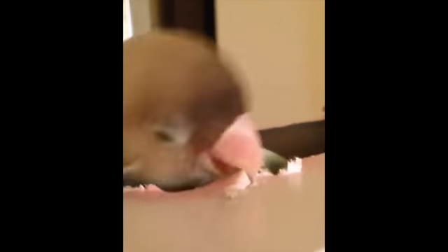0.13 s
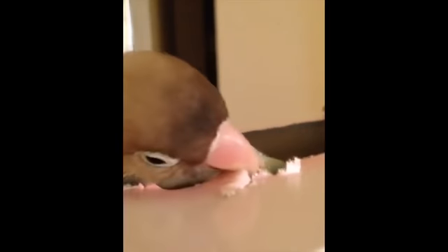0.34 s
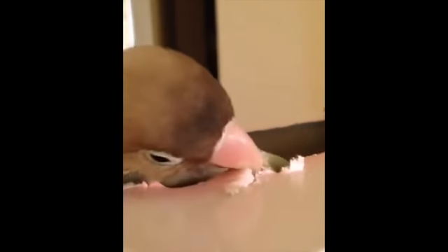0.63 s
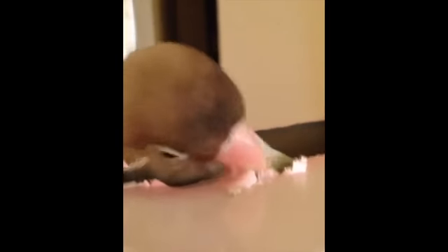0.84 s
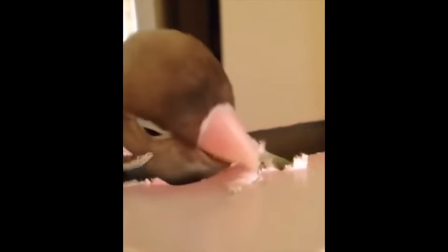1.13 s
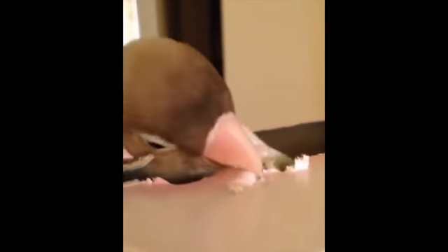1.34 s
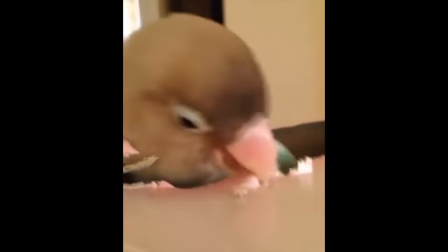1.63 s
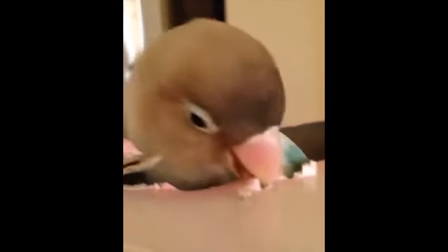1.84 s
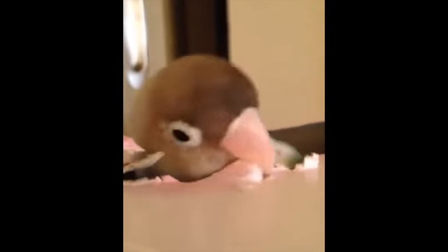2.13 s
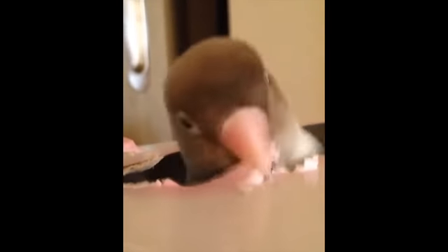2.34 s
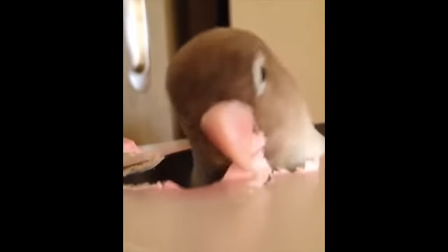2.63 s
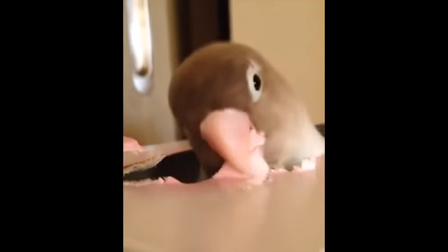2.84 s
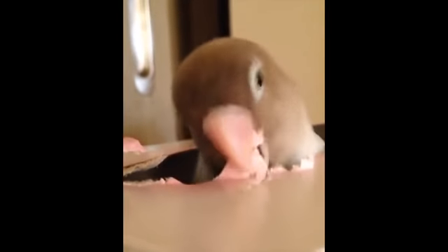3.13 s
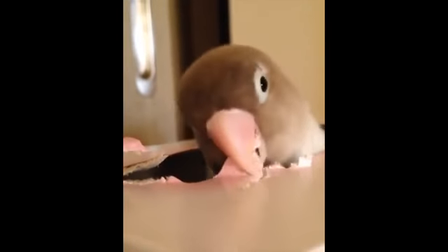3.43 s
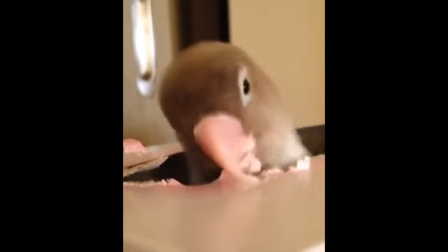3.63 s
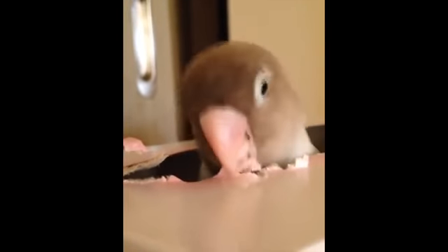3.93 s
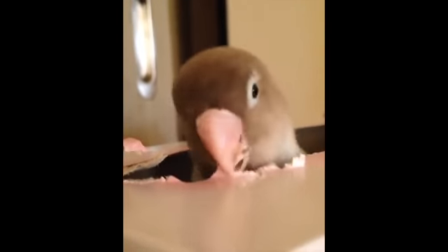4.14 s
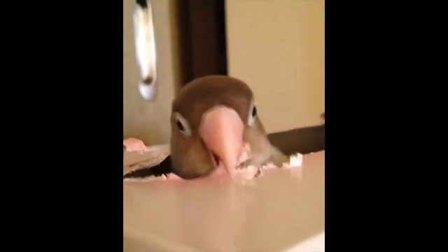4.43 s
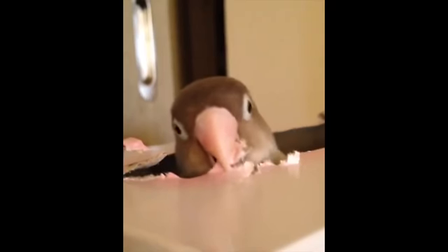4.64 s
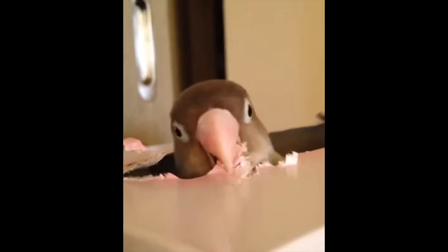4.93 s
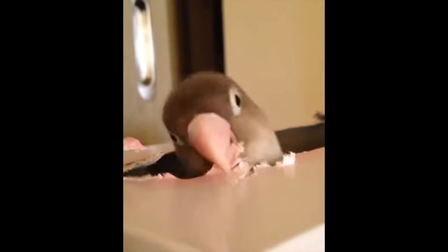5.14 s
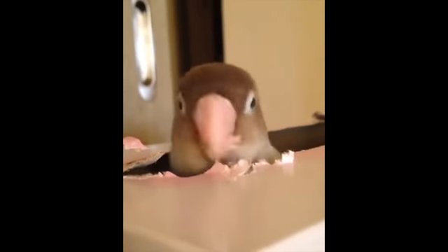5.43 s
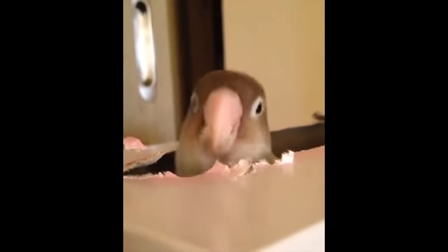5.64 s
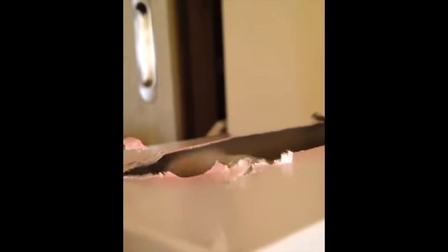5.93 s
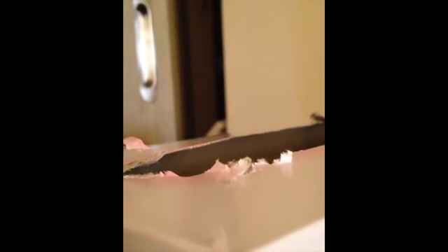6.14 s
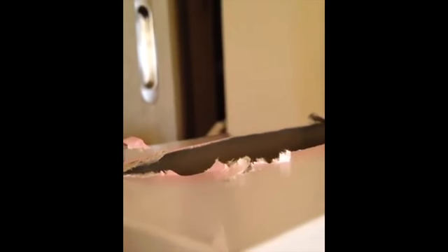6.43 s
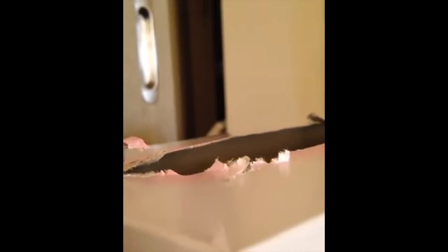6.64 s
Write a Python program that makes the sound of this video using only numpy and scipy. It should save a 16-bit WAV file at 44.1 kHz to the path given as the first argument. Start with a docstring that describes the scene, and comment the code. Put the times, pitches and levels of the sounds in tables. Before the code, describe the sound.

Close, irregular cardboard gnawing by a small bird: dry clicks, a few louder hollow pops, short tearing scratches, then near quiet and final knocks.

```python
"""A small parrot chews the torn edge of a hollow cardboard box, close to a phone, in a quiet room.
Each tug of the beak is a short gritty burst that sets the box ringing, and snapping fibres tick in the treble.
Paper tears in short rasps of tiny slips, and between bites the beak rubs the edge in jerks.
A short dull echo follows the tugs and snaps; a wavering low drone and microphone hiss lie underneath."""
import sys
import numpy as np
from scipy import signal
from scipy.fft import rfft, irfft, next_fast_len
from scipy.io import wavfile
from scipy.ndimage import uniform_filter1d, map_coordinates

SR = 44100
rng = np.random.default_rng(int(sys.argv[2]) if len(sys.argv) > 2 else 0)


def wav_out(sig):
    """Save sig, one row per channel (or a flat mono array), as 16-bit PCM at SR to the path in sys.argv[1]."""
    wavfile.write(sys.argv[1], SR, np.round(np.clip(np.atleast_2d(sig).T, -1, 1) * 32767).astype(np.int16))


N = 298998

# Tugs of the beak: start t/s, walls level/dB, lid over walls/dB, side over walls/dB,
# edge over walls/dB, dying time/s
BEAK_TUGS = [(0.262, -30, -17, -11, -6, 0.0019), (0.273, -35.5, -8, -5, -9.5, 0.0038),
             (0.291, -41.5, -8, -3, 1.5, 0.0028), (0.331, -44, -10, -6, -7, 0.0021),
             (0.354, -35, -15, -13, 1.5, 0.0021), (0.366, -50, -18, -4, -7, 0.00036),
             (0.4, -32.5, -14, -15, 0.5, 0.00125), (0.418, -38, -8, -5, 1, 0.0027),
             (0.816, -45, -11, -5, -17, 0.0016), (0.873, -52, -14, -15, -1, 0.0028),
             (0.965, -43.5, -13, -6, -10, 0.0032), (1.002, -39.5, -11, -14, -10, 0.003),
             (1.096, -55, -8, -10, 2, 0.0054), (1.161, -51, 10, 4.5, 6, 0.00096),
             (1.238, -43.5, 1, -5, -9, 0.0016), (1.251, -44, -10, -11, -2.5, 0.0038),
             (1.321, -45, -3, -12, -9, 0.0025), (1.4, -26, -23, -20, -19.5, 0.002),
             (1.516, -43, -25, -14, -8.5, 0.0023), (1.536, -50, -17, -11, -9, 0.0007),
             (1.619, -16, -32, -17.5, -9.5, 0.0025), (1.965, -44.5, -2, -13, -20, 0.0013),
             (2.012, -50, -21, -14, -13, 0.002), (2.141, -50.5, -6, 4.5, 8.5, 0.0044),
             (2.297, -40, 2.5, -0.5, -17, 0.0026), (2.338, -43, 3, -12, -9, 0.0012),
             (2.384, -50, -1, -1, 7.5, 0.0025), (2.431, -39.5, 2, 0.5, 0, 0.0021),
             (2.476, -44, 5, -2, -2, 0.0014), (2.519, -40.5, -1.5, -3, -3, 0.01),
             (2.533, -31, -22, -7.5, -1, 0.0014), (2.563, -45, -17, -10, -12, 0.003),
             (2.804, -45.5, -9, -5, -16, 0.0017), (2.929, -38, -4.5, -4, -7, 0.0015),
             (2.984, -47, -17, 0, 0, 0.0016), (3.037, -40, -21, -21, -18, 0.0026),
             (3.054, -42.5, -16, -7, -7, 0.00072), (3.186, -42, -16, -7, -10, 0.0027),
             (3.299, -45, -2, -0.5, -0.5, 0.0013), (3.429, -42.5, -11, -7, -5.5, 0.0063),
             (3.485, -37.5, -12, -1.5, -4, 0.0023), (3.594, -30, -10, -3.5, -6.5, 0.0013),
             (3.615, -28, -12, -14, -19, 0.0036), (3.734, -48.5, -9, -4, 2, 0.0028),
             (3.77, -43.5, -11, -1, 1, 0.00081), (3.985, -52, -8, -17, 10, 0.0029),
             (4.066, -35, -11, -3.5, -5, 0.00074), (4.088, -46, -14, -9, 3, 0.00114),
             (4.107, -49.5, -16, -13, 3, 0.00066), (4.138, -40.5, -17, -15, -0.5, 0.0006),
             (4.145, -38.5, -14, -6, -4.5, 0.0014), (4.169, -49, -16, -3, 6, 0.0009),
             (4.309, -39.5, -15.5, -5.5, -2.5, 0.0014), (4.364, -46, -20, -20, -3, 0.0033),
             (4.411, -43, -9, -3, -9, 0.0011), (4.513, -42, -16, -25, -12, 0.0016),
             (4.543, -39.5, -17, -7, -18, 0.0032), (4.576, -36, -1, -8, -15, 0.00072),
             (4.755, -44.5, -1, -3, -9, 0.0013), (4.834, -47, -13.5, -13, -6, 0.00081),
             (5.007, -33, -5.5, -9.5, -8, 0.00091), (5.082, -46, -1, 4, 0.5, 0.0035),
             (5.302, -43.5, -13, -5.5, -10, 0.0032), (5.316, -44, -19.5, -4, 4.5, 0.0019),
             (5.476, -26, -20, -8, -10, 0.0019), (5.493, -49, -18, -4, 0.5, 0.004),
             (5.539, -46, -20, -14, 11.5, 0.0033), (5.558, -44.5, -0.5, -21, -14, 0.0014),
             (6.474, -46, -4, -14, 2, 0.0037), (6.5, -27.5, -18, -9.5, -30, 0.0015),
             (6.693, -27.5, -14, -3, -19.5, 0.002)]
# Fibres snapping: start t/s, middle level/dB, top end over middle/dB, dying time/s
FIBRE_SNAPS = [(0.2613, -45, -8, 0.00076), (0.2912, -49, -6, 0.00021), (0.35, -39, -10, 0.00054),
               (0.3538, -49, -4, 0.00023), (0.368, -51, -13, 0.00023), (0.399, -38, -7, 0.0005),
               (0.419, -57, -4, 0.0013), (1.401, -48, 0, 0.0015), (1.5908, -57, -1, 0.0023),
               (1.6185, -36, -21, 0.00044), (1.894, -53, -10, 0.00044), (2.1725, -53, -6, 0.0003),
               (2.1934, -53, -7, 0.00025), (2.4324, -62, -7, 0.0013), (2.5326, -47.5, 0, 0.00055),
               (2.574, -53, -5, 0.0004), (2.604, -44.5, 1, 0.0013), (2.692, -56, -8, 0.0016),
               (2.7, -51, -1, 0.00028), (2.93, -60, 9, 0.00033), (2.952, -58, 10, 0.0003),
               (2.993, -60, 9, 0.0003), (3.019, -57, 0, 0.00032), (3.038, -53, 11, 0.00033),
               (3.055, -55, 11, 0.00043), (3.1532, -51, -4, 0.001), (3.38, -51, 1, 0.00069),
               (3.5109, -49, 0.5, 0.00055), (3.5693, -48, -8, 0.0011), (3.5898, -42.5, 2, 0.0015),
               (3.597, -49, 10, 0.0008), (3.613, -51, 6, 0.0014), (3.617, -46, -13, 0.0007),
               (3.709, -50, 0, 0.0015), (3.9454, -53, 4, 0.0004), (3.9619, -58, 10, 0.00034),
               (3.9843, -37.5, 4, 0.0009), (3.994, -53, 10, 0.00049), (4.0876, -47, -4, 0.00052),
               (4.1067, -47, 3, 0.00033), (4.1365, -51, 10.5, 0.00081), (4.145, -47, -4, 0.00061),
               (4.154, -50, -5, 0.0013), (4.1679, -45, -7, 0.00035), (4.176, -46, -4, 0.00075),
               (4.7411, -49, -11, 0.00086), (5.0838, -55, 2, 0.00055), (5.3033, -49.5, -9, 0.0011),
               (5.32, -49, -12, 0.00052), (5.4784, -45, -1, 0.00065), (5.5114, -51, -5, 0.0063),
               (5.5378, -50, -8, 0.0017), (6.482, -43.5, -13, 0.0019), (6.4996, -55, -10, 0.00093),
               (6.6982, -46.5, -1, 0.0013)]
# Paper tearing in short rasps: middle t/s, length/s, tearing hiss level/dB, edge over hiss/dB
PAPER_RASPS = [(0.047, 0.085, -64, 5), (.275, 0.034, -56, 0), (0.301, 0.031, -54, 3),
               (0.363, 0.036, -51, 8), (0.418, .045, -52, 1), (0.877, 0.029, -61, 5),
               (0.996, 0.073, -59, 5.5), (1.101, 0.037, -58.5, 0.5), (1.144, 0.077, -67, 9),
               (1.22, 0.1, -70, 11.5), (1.412, 0.053, -63, 5.5), (1.65, .06, -60, 6),
               (1.605, 0.034, -52, -9), (1.907, 0.13, -60.5, 2), (2.214, 0.11, -57, -5.5),
               (2.372, 0.1, -65, 11.5), (2.495, 0.077, -66, 10), (2.443, 0.049, -61, 15),
               (2.602, 0.088, -51, -4), (2.692, 0.049, -59.5, -14), (2.801, 0.076, -56, -11),
               (2.964, 0.088, -60.5, -4), (3.039, 0.11, -55, -1.5), (3.192, 0.17, -57, -13),
               (3.268, 0.032, -59, 5.5), (3.378, 0.046, -55.5, -6), (3.608, 0.043, -46.5, 3),
               (3.889, 0.076, -54, -2), (3.978, 0.071, -52, -8), (4.167, 0.085, -49.5, -2.5),
               (4.226, 0.012, -56, 2), (4.368, 0.12, -59.5, -2), (4.433, .04, -60, 2.5),
               (4.572, 0.066, -51.5, 1.5), (4.734, 0.077, -61.5, 5.5), (4.833, .05, -57, -6.5),
               (5.09, 0.029, -55, -0.5), (5.112, .07, -66.5, 9.5), (5.269, 0.053, -52.5, -9),
               (5.315, 0.029, -61.5, 12), (5.364, 0.035, -61, -3), (5.514, 0.027, -54.5, 9),
               (5.552, 0.055, -53, 5), (6.492, 0.086, -56, 1.5)]
# Rubbing between bites: t/s, level in the walls/dB
RUB_LEVELS = [(0.0, -61.5), (0.23, -60), (0.51, -70), (0.73, -67.5), (1.09, -55.5), (1.42, -61),
              (2.19, -55.5), (2.34, -58), (2.49, -50), (2.72, -60), (3.44, -57.5), (4.04, -56.5),
              (4.55, -60.5), (4.81, -67.5), (5.04, -61.5), (5.17, -62), (5.44, -61.5), (5.55, -62),
              (5.83, -75), (6.46, -72), (6.67, -66.5), (6.78, -64)]
# Low drone: t/s, level/dB before DRONE_LIFT_DB
DRONE_LEVELS = [(0.0, -58), (0.05, -71), (4.14, -63), (4.17, -51), (4.68, -66.5), (4.76, -54), (5.19, -80),
                (5.23, -53), (5.38, -76), (5.48, -45), (5.63, -80), (5.72, -48.5), (5.8, -61.5),
                (5.99, -50), (6.21, -59.5), (6.78, -49.5)]

# Resonances of the box and the paper, each table: f/Hz, width/Hz, relative level/dB
WALL_MODES = [(543.5, 75, -6.5), (682, 55.4, -2.5), (825, 49.4, -1), (1001, 141, -1), (1173, 248, -3.5)]  # box walls
LID_MODES = [(143.7, 27.3, -0.44), (216, 35, -0.34)]  # box lid
SIDE_MODES = [(278, 29, -1.5), (351, 79, -2)]  # box side
EDGE_MODES = [(1537, 330, 1.5), (1959, 300, 5), (2407, 120, 3), (2810, 840, -4), (3447, 190, 0.5),
              (4070, 530, -5.5)]  # stiff edge
FIBRE_MODES = [(6350, 22000, 0)]  # rubbed fibres
TEAR_MODES = [(5100, 5900, 0)]  # tearing paper
# Colour of the hiss: f/Hz, relative level/dB per Hz
HISS_COLOUR = [(15, -54), (40, -4.5), (110, -5), (200, -12.5), (400, -19.5), (1300, -27.5), (3000, -29),
               (6000, -29), (13000, -31), (16000, -24.5)]

SPAN, LEAD = 4096, 1024  # samples: window of one event, and its part before the crest
TUG_RISE, SNAP_RISE = 0.9, 0.6  # swell time over dying time
JOLT_GROWS = 0.42  # dB of clean jolt per dB of tug
RASP_SKEW = 0.67  # under 1: a tear starts faster than it fades
RASP_WALLS_DB = -0.5  # the walls over the edge
RUB_USUAL_DB = -59  # walls level at the usual pressure
RUB_THUD_DB, RUB_EDGE_DB, RUB_FIBRES_DB = -61, -64.5, -65.5  # at the usual pressure
THUD_GROWS, EDGE_GROWS, FIBRES_GROWS = 1, 0.82, 0.41  # dB per dB of pressure
ECHO_DB, DRONE_LIFT_DB, HISS_DB = -21, 3.5, -56.5
ROLL_HZ, TOP_HZ = 13950, 15150  # the phone starts to fade, and stops


def tugs():
    """Harder tugs jolt cleaner; each drives lid, side, walls and edge, every mode at a new strength."""
    start, db, lid_db, side_db, edge_db, fall = np.transpose(BEAK_TUGS)
    rise = TUG_RISE * fall
    jolt = 8.1 * amp(JOLT_GROWS * (db - db.mean()))[:, None]
    push = bursts(rise, fall, jolt)
    deep_push = soft(push, hz=1530)  # the fold damps what travels on into the box
    edge_push = soft(push, hz=4200)

    def ring(drive, table, level_db):
        """One part of the box rings, its modes scattered afresh for every tug."""
        scatter_db = rng.normal(0, 1.53, (len(start), len(table), 1))
        return amp(level_db)[:, None] * peak(filtered(drive, modes(table, scatter_db)))

    walls = ring(deep_push, WALL_MODES, db)
    lid = ring(deep_push, LID_MODES, db + lid_db)
    side = ring(deep_push, SIDE_MODES, db + side_db)
    edge = ring(edge_push, EDGE_MODES, db + edge_db)
    return place(start + rise, walls + lid + side + edge)


def snaps():
    """Fibres break: bright ticks, some dull, some mostly top end."""
    start, db, top_db, fall = np.transpose(FIBRE_SNAPS)
    rise = SNAP_RISE * fall
    crack = bursts(rise, fall, jolt=1.5)
    # squaring a resonance passes the sound through it twice
    middle = peak(filtered(crack, lambda f: modes([(5800, 5000, 0)])(f) ** 2))
    top = peak(filtered(crack, lambda f: modes([(11500, 7000, 0)])(f) ** 2))
    return place(start + rise, amp(db)[:, None] * (middle + amp(top_db)[:, None] * top))


def rasps():
    """Each tear swells and fades; its gritty slips hiss in the paper and buzz edge and walls."""
    middle, length, db, edge_db = np.transpose(PAPER_RASPS)
    progress = ((np.arange(SPAN) - SPAN // 2) / SR) / length[:, None]  # the window cuts the longest tears
    swell = np.sin(np.pi * np.clip(progress + 0.5, 0, 1) ** RASP_SKEW)
    at = (middle - (SPAN // 2 - LEAD) / SR).clip(0)  # puts the window's centre on the middle
    hiss_level = place(at, amp(db)[:, None] * swell)
    box_level = place(at, amp(db + edge_db)[:, None] * swell)
    slips = grains(1.95 * wobble(120), spike_db=4.0)
    box = murmur(EDGE_MODES, slips) + amp(RASP_WALLS_DB) * murmur(WALL_MODES, slips)
    return hiss_level * murmur(TEAR_MODES, slips) + box_level * box


def rubbing():
    """The beak slides on the edge in jerks and keeps the box murmuring; one pressure drives every part."""
    walls_db, = curves(RUB_LEVELS)
    press_db = walls_db - RUB_USUAL_DB
    jerks = 4.65 * wobble(22) + 3.9 * wobble(90)
    thud_clumps = 0.46 * jerks + 3.7 * wobble(30)
    walls = murmur(WALL_MODES, grains(0.63 * jerks, spike_db=4.5))
    edge = murmur(EDGE_MODES, grains(0.88 * jerks, spike_db=-1.0))
    thud = murmur(LID_MODES + SIDE_MODES, grains(thud_clumps, spike_db=1.5))
    fibres = murmur(FIBRE_MODES, grains(0.71 * jerks, spike_db=-1.0))
    walls = amp(walls_db) * walls
    edge = amp(RUB_EDGE_DB + EDGE_GROWS * press_db) * edge
    thud = amp(RUB_THUD_DB + THUD_GROWS * press_db) * thud
    fibres = amp(RUB_FIBRES_DB + FIBRES_GROWS * press_db) * fibres
    return walls + edge + thud + fibres


def tail(x):
    """The near walls answer with a short dull wash of decaying noise."""
    t = np.arange(SR // 4) / SR
    fading_noise = rng.standard_normal(len(t)) * amp(-60 * t / 0.11)  # 60 dB down in 0.11 s
    wash = soft(fading_noise, hz=2620)
    delayed = np.pad(x, (300, 0))  # samples, about 7 ms
    return signal.fftconvolve(delayed, wash / np.linalg.norm(wash))[:N]


def room():
    """A low drone, a sine whose pitch wavers around 65 Hz, over broad hiss of shaped noise."""
    drone_db, = curves(DRONE_LEVELS)
    pitch_hz = 65 + 5 * wobble(25)
    drone = amp(drone_db + DRONE_LIFT_DB) * np.sin(2 * np.pi * np.cumsum(pitch_hz) / SR)
    hz, db = np.transpose(HISS_COLOUR)
    noise = rng.standard_normal(N)
    hiss = filtered(noise, lambda f: amp(np.interp(np.log(f + 1), np.log(hz), db)))
    return drone + amp(HISS_DB) * unit(hiss)


def bursts(rise, fall, jolt):
    """One slip of the beak per row: grit that swells fast and dies, with one clean jolt at the crest."""
    t = (np.arange(SPAN) - LEAD) / SR
    z = rng.standard_normal((len(rise), 2, SPAN))
    grit = z[:, 0] * amp(5.7 * z[:, 1])  # noise of uneven strength
    pace = np.clip(np.where(t < 0, rise[:, None], fall[:, None]), 1e-4, 0.016)
    u = np.abs(t) / pace
    return grit * np.exp(-np.where(t < 0, u * u, u)) + jolt * (t == 0)


def grains(clumps_db, spike_db):
    """Friction: uneven tiny slips whose size follows the clumps."""
    return rng.standard_normal(N) * amp(clumps_db + spike_db * wobble(350))


def murmur(table, slips):
    """Slips heard through resonances, rms 1."""
    return unit(filtered(slips, modes(table)))


def modes(table, scatter_db=0):
    """Causal response of resonances; scatter_db holds one offset per mode (and per blow)."""
    centre, width, db = np.transpose(table)[..., None]
    sign = (-1) ** np.arange(len(table))[:, None]  # neighbours ring in opposite directions
    gain = sign * amp(db + scatter_db)

    def response(f):
        damping = 1j * f * width
        return np.sum(gain * damping / (centre * centre - f * f + damping), axis=-2)

    return response


def soft(x, hz):
    """A yielding contact passes little above hz."""
    return filtered(x, lambda f: 1 / (1 - (f / hz) ** 2 + 1.2j * f / hz))


def filtered(x, response):
    """x times a complex response of frequency."""
    m = next_fast_len(x.shape[-1] + SPAN)
    spectrum = rfft(x, m) * response(np.fft.rfftfreq(m, 1 / SR))
    return irfft(spectrum, m)[..., :x.shape[-1]]


def place(times, rows):
    """Sum the rows into one track, crests at their times."""
    at = np.round(times * SR).astype(int)[:, None] + np.arange(SPAN)
    return np.bincount(at.ravel(), rows.ravel(), N + SPAN)[LEAD:][:N]


def curves(rows):
    """One value per sample for each column after the time."""
    s, *cols = np.transpose(rows)
    return [np.interp(np.arange(N) / SR, s, c) for c in cols]


def wobble(rate):
    """A smooth random curve, rate knots a second."""
    knots = rng.standard_normal(int(N * rate / SR) + 4)
    return map_coordinates(knots, [np.arange(N) * rate / SR])


def peak(rows):
    """Each row scaled so that the envelope of its loudest 3 ms is 1."""
    power = uniform_filter1d(2 * rows ** 2, size=128)
    return rows / np.sqrt(power.max(axis=-1, keepdims=True))


def unit(x):
    """x scaled to rms 1."""
    return x / np.sqrt(np.mean(x ** 2) + 1e-20)


def amp(db):
    """Decibels as a plain factor."""
    return 10 ** (np.asarray(db) / 20)


def scene():
    """Tugs and snaps with their echo, then rubbing, rasps and the quiet room."""
    beak = tugs() + snaps()
    echo = amp(ECHO_DB) * tail(beak)
    return (beak + echo + rubbing() + rasps() + room())[None]


def record(dry):
    """The phone fades fast above its band edge and keeps nothing over the limit."""
    def response(f):
        fade_db = -39 * np.clip((f - ROLL_HZ) / 350, 0, 1)
        return amp(fade_db) * (f < TOP_HZ)

    return filtered(dry, response)


dry = scene()
out = record(dry)
wav_out(out)
```